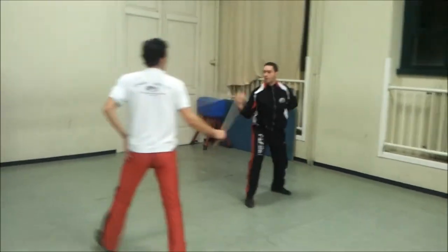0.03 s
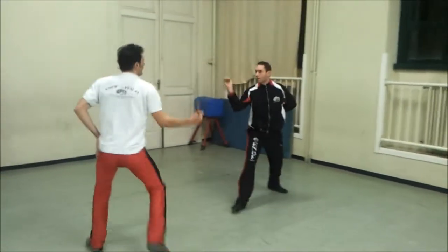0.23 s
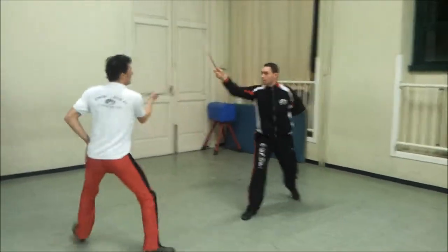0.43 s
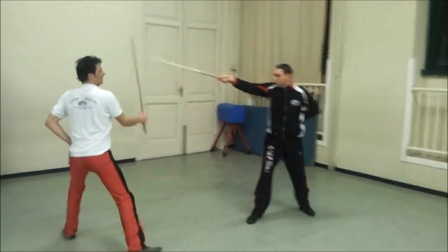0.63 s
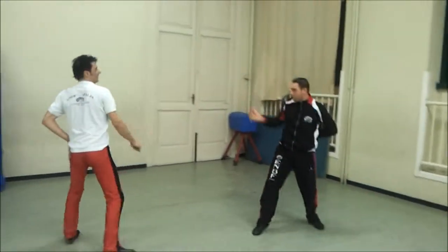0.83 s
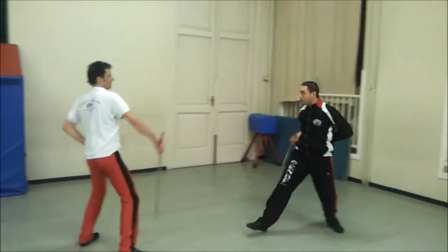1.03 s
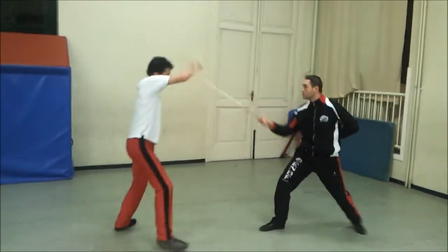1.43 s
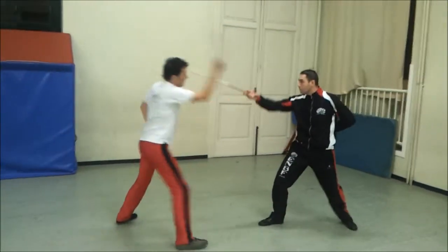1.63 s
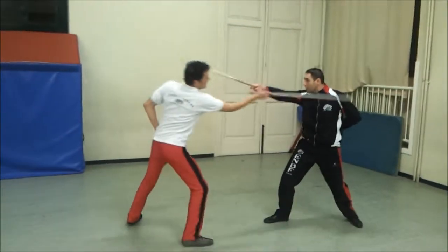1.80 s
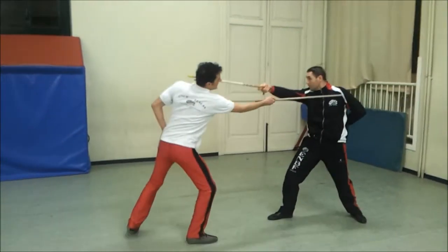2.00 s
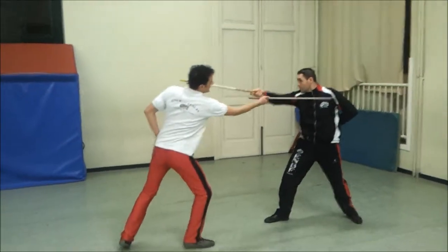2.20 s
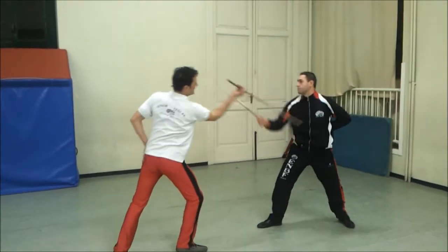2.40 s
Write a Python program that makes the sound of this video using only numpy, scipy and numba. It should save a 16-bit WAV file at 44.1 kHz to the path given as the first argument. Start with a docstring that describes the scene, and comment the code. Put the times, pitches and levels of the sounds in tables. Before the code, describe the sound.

Thin wooden sticks clash in an echoing training room over faint room air. A light double clack at 0.2 seconds precedes a very hard crack with a low thump at 0.5, its echo lingering. Two glancing touches follow around 0.7. A hollow stamping step lands at 1.2 and a last stick knock at 1.3. Sleeves rustle softly from 1.8, and a shoe slides from about 2.2.

```python
"""Faint room air, then a light double clack: two people spar with thin wooden sticks in a bare, echoing
training room. Each hit rings both sticks and snaps with noise. One very hard crack with a low thump
follows, then two glancing touches, a stamping step on a hollow-sounding floor and a last knock; sleeves
rustle and a shoe slides, both friction hiss. The hard crack overloads the gain control, whose slow
recovery holds the long echo level before letting it die."""
import sys
import numpy as np
from scipy import signal
from scipy.fft import rfft, irfft
from scipy.io import wavfile
from scipy.ndimage import uniform_filter1d
from numba import njit

SR = 44100
rng = np.random.default_rng(int(sys.argv[2]) if len(sys.argv) > 2 else 0)


def dump(signal):
    """Clip the signal to [-1, 1] and save it as 16-bit WAV at the path in sys.argv[1]."""
    limited = np.clip(np.atleast_2d(signal).T, -1, 1)
    pcm = np.round(limited * 32767).astype(np.int16)
    wavfile.write(sys.argv[1], SR, pcm)


N = 112454
HZ = np.fft.rfftfreq(N, 1 / SR)
T = np.arange(N) / SR

# stick hits (time [s], level [dB], first stick [dB], second stick [dB], crack [dB], reverb send [dB],
# boost frequency [Hz], boost [dB], left over right [dB])
STICK_HITS = [(.1878, -20.5, -3, -13, 10, 7, 5040, 5.5, 5), (0.1899, -21.5, 1.5, -11, 7, 7, 3500, 6.5, 4),
              (0.2117, -17, -2, -11.5, 3, 16.5, 6800, 8, 3),
              (.5113, 8.5, -13, -16.5, 1.5, 1.5, 4620, 6, 3.5),
              (0.5156, 4.5, -17, 0.5, -1.5, 8, 3600, 2, .5), (.718, -19.5, -27, -6, 3, 14, 4340, 12, -2),
              (.753, -11.5, -10, -1.5, 3.5, 8, 7650, 9.5, -5),
              (1.3409, -12.5, -13, -11, -5.5, -12, 6800, 14.5, 2),
              (1.3434, -11, -10, -4.5, -5.5, 6, 1990, 5.5, 5)]
# bending modes of each stick and of the floor (frequency [Hz], level [dB], t60 [s])
FIRST_STICK_MODES = [(332, -26, 0.053), (950, -22, 0.017), (1364, -10, 0.024), (1730, -7, 0.024),
                     (2206, -9.5, 0.044), (2740, -10.5, 0.027), (3416, -4, 0.012), (3860, -11, 0.024),
                     (4360, -14.5, 0.022), (5060, -5, 0.021), (5785, -6, 0.013), (7210, -21, 0.041)]
SECOND_STICK_MODES = [(569, -26.5, 0.041), (1261, -9.5, 0.026), (1622, -7.5, 0.022), (1994, -7, 0.016),
                      (2288, -3.5, 0.016), (2680, -6, 0.023), (3018, -5, 0.021), (3284, -6, .02),
                      (3580, -7.5, .017), (3898, -10, .018), (4243, -8.5, 0.015), (4715, -4, 0.017),
                      (5630, -20, 0.0076)]
FLOOR_MODES = [(404, -7, 0.034), (510, -5, 0.029), (652, -8.5, 0.018)]
# short rings at the struck spot
# (time [s], frequency [Hz], level [dB], t60 [s], reverb send [dB], left over right [dB])
WOOD_PINGS = [(0.2123, 4513, -6, 0.019, 4, 5), (1.3427, 2420, -4, 0.025, -9, 2)]
# dull thumps under the hard crack and its echo (time [s], level [dB])
THUMP_HITS = [(0.51, -30), (.531, -26.5)]
# footfalls (time [s], level [dB], reverb send [dB])
FOOTFALLS = [(1.225, -18, 4), (1.343, -22.5, 11.5)]
# rubbing strokes (start [s], rise [s], hold [s], time to fade 10 dB [s], level [dB])
SLEEVE_STROKES = [(1.82, 0.025, 0.23, 0.41, -33.5)]
SHOE_STROKES = [(2.18, 0.15, 0.084, 0.36, -33)]
# tone colour of each noise layer (frequency [Hz], level [dB])
AIR_EQ = [(25, -24), (60, -31), (105, -12), (220, 1.5), (490, 1.5), (1400, 3.5), (2400, 0), (4200, -9),
          (5600, -9.5), (7800, -4.5), (9500, -13), (13500, -34.5), (15500, -39)]
CRACK_EQ = [(50, -46), (130, -24), (300, -12.5), (500, -7), (950, 1), (1400, -1.5), (2600, 5), (4800, 5),
            (6000, 3.5), (8000, -2), (9500, -3.5), (13000, -16.5), (16000, -50)]
REVERB_EQ = [(100, -2.5), (500, -0.5), (1000, 1), (2500, 5), (4500, 0.5), (8000, 2), (10000, -1.5),
             (14000, -47)]
THUMP_EQ = [(20, 7), (60, -0.5), (150, -5), (300, -5.5), (500, -24), (1200, -49)]
SOLE_EQ = [(40, -41), (110, -19), (250, -12), (400, -4.5), (520, -2.5), (660, -6), (900, -16),
           (2500, -12.5), (5000, -38), (8000, -15.5), (11000, -26.5), (15000, -57)]
CLOTH_EQ = [(40, -42), (100, 0), (500, 0.5), (2000, 11.5), (5000, -4.5), (7800, -18), (9500, -9),
            (14000, -15.5), (16000, -32)]
SLIDE_EQ = [(50, -26), (110, -5), (250, 0.5), (520, 8.5), (850, 2.5), (1300, 6.5), (2400, 1), (3200, -4),
            (4500, -2.5), (5000, 4), (5500, -6.5), (7800, -4), (9200, -11), (12000, -15), (15000, -54)]
# the room's decay (frequency [Hz], t60 [s])
REVERB_DECAY = [(100, 3.1), (500, 2.8), (1300, 2.61), (2500, 2.31), (4500, 1.77), (8000, 1.146),
                (13000, 0.11)]
# likeness of left and right in the diffuse field (frequency [Hz], correlation [-1..1])
STEREO_CORRELATION = [(60, 0.42), (250, 0.75), (550, 1), (1000, 0.22), (1500, -0.33), (2800, 0.11),
                      (5000, 0.18), (10000, 0.001)]
# early reflections off walls and ceiling (delay [s], level against the tail [dB])
REFLECTIONS = [(0.014, -20), (0.016, -14), (0.0237, -13), (0.031, -17.5), (.045, -24)]


def amp(db):
    """Decibels to gain."""
    return 10 ** (np.asarray(db) / 20)


def curve(points, hz):
    """A table read along a log-frequency axis."""
    frequency, value = np.transpose(points)
    return np.interp(np.log(hz + 1), np.log(frequency + 1), value)


def add(mix, start, sound):
    """Lays a sound into the stereo mix, start in seconds."""
    part = mix[:, round(start * SR):][:, :sound.shape[1]]
    part += sound[:, :part.shape[1]]


def diffuse_noise(eq):
    """Coloured noise of rms 1 with the stereo width of a diffuse field."""
    mid, side = rfft(rng.standard_normal((2, N)))
    likeness = np.clip(curve(STEREO_CORRELATION, HZ), -.99, .99)
    mid, side = mid * np.sqrt(1 + likeness), side * np.sqrt(1 - likeness)
    noise = irfft(np.array([mid + side, mid - side]) * amp(curve(eq, HZ)), N)
    return noise / noise.std()


def burst(eq, t60, t):
    """A dying noise burst, evened out so that its spectrum follows the EQ curve."""
    fade = amp(-60 * t / t60)
    noise = rng.standard_normal((2, len(t))) * fade
    noise = noise + 0.348 * noise[::-1]  # crossfeed narrows the image
    colour = amp(curve(eq, np.fft.rfftfreq(len(t), 1 / SR)))
    for _ in range(6):  # impose the colour, then tighten the tail
        spectrum = rfft(noise)
        noise = irfft(spectrum / abs(spectrum) * colour, len(t)) / (1 + (t / t60) ** 4)
    return noise * np.sqrt(np.sum(fade ** 2) / np.mean(np.sum(noise ** 2, 1)))


def ring(modes, t, scatter_turns=0.11):
    """Quickly damped modes; neighbours swing in opposite senses, and phase scatter adds width."""
    hz, db, t60 = np.transpose(modes)[:, :, None]
    phase = np.arange(len(modes))[:, None] / 2 + scatter_turns * rng.standard_normal((2, len(modes), 1))
    return np.sum(amp(db - 60 * t / t60) * np.sin(2 * np.pi * (hz * t + phase)), axis=1)


def room_air(level_db=-40.5):
    """A steady, wide bed of air noise."""
    return amp(level_db) * diffuse_noise(AIR_EQ)


def sticks(attack_s=0.00083, crack_trim_db=-2.5, low_cut_hz=260):
    """Each hit rings both sticks under a splintery crack; the struck spot favours one register."""
    out, t = np.zeros((2, N)), T[:4096]
    for start, db, first_db, second_db, crack_db, send_db, boost_hz, boost_db, pan_db in STICK_HITS:
        wood = amp(first_db) * ring(FIRST_STICK_MODES, t) + amp(second_db) * ring(SECOND_STICK_MODES, t)
        crack = amp(crack_trim_db + crack_db) * burst(CRACK_EQ, t60=0.013, t=t)
        clack = amp(db) * (wood + crack) * np.minimum(t / attack_s, 1)
        register = signal.lfilter(*signal.iirpeak(boost_hz, Q=3, fs=SR), clack)
        clack += (amp(boost_db) - 1) * register
        add(out, start, in_room(clack, send_db, pan_db))
    return signal.sosfilt(signal.butter(6, low_cut_hz, "high", fs=SR, output="sos"), out)


def in_room(sound, send_db, pan_db=0, predelay_s=0.0087, build_s=0.01):
    """Panned direct sound, early reflections and a long diffuse tail that loses its treble first."""
    hz, t, spectrum = signal.stft(diffuse_noise(REVERB_EQ), SR, nperseg=512)
    decay = amp(-60 * t / curve(REVERB_DECAY, hz)[:, None])
    response = signal.istft(spectrum * decay, SR, nperseg=512)[1][:, :N]
    response *= np.clip((T - predelay_s) / build_s, 0, 1)
    lean_left_db = np.array([[.5], [-.5]])
    response *= amp(send_db + lean_left_db) / np.sqrt(np.sum(response ** 2) / 2)
    for delay, db in REFLECTIONS:
        for channel in response:
            arrival = delay + rng.uniform(-.0004, .0004)
            channel[round(arrival * SR)] += amp(db + send_db)
    response[:, 0] += amp(pan_db * np.array([.5, -.5]))  # direct path
    return signal.fftconvolve(sound, response, axes=1)[:, :N]


def pings(attack_s=0.00055):
    """A glancing contact rings one note of the wood, with a rounded attack."""
    out, t = np.zeros((2, N)), T[:4096]
    for start, hz, db, t60, send_db, pan_db in WOOD_PINGS:
        ping = ring([(hz, db, t60)], t) * np.minimum(t / attack_s, 1)
        add(out, start, in_room(ping, send_db, pan_db))
    return out


def thumps():
    """Short, low mono thumps give the hard crack its weight."""
    out = np.zeros((2, N))
    for start, db in THUMP_HITS:
        add(out, start, amp(db) * burst(THUMP_EQ, t60=0.055, t=T[:8192])[:1])
    return out


def feet(knock_attack_s=0.0024, low_cut_hz=170):
    """Soles slap down in a lunge and the floor answers with a hollow knock."""
    out, t = np.zeros((2, N)), T[:4096]
    for start, db, send_db in FOOTFALLS:
        knock = ring(FLOOR_MODES, t) * np.minimum(t / knock_attack_s, 1)
        slap = burst(SOLE_EQ, t60=0.02, t=t)
        add(out, start, in_room(amp(db) * (slap + knock), send_db))
    return signal.sosfilt(signal.butter(2, low_cut_hz, "high", fs=SR, output="sos"), out)


def friction(strokes, eq, roughness_db):
    """Diffuse rubbing hiss that swells, holds and fades, roughened by uneven grip."""
    envelope = np.zeros(N)
    for start, rise, hold, fade, db in strokes:
        fade_db = 10 * np.maximum(T - start - rise - hold, 0) / fade
        envelope += amp(db - fade_db) * np.clip((T - start) / rise, 0, 1)
    grip = uniform_filter1d(rng.standard_normal(N), size=700)
    return diffuse_noise(eq) * envelope * amp(roughness_db * grip / grip.std())


def sleeves():
    """Cloth rubs in a grainy rustle."""
    return friction(SLEEVE_STROKES, CLOTH_EQ, roughness_db=1.4)


def shoe_slide():
    """A sole drags over the floor with a smoother hiss."""
    return friction(SHOE_STROKES, SLIDE_EQ, roughness_db=0.6)


def scene():
    """Sticks, feet and clothes over the bed of room air."""
    return sticks() + pings() + thumps() + feet() + sleeves() + shoe_slide() + room_air()


@njit
def gain_reduction(over_db, attack_s, recovery_db_per_s):
    """Gain reduction in dB: it grabs an overload quickly and lets go at a steady rate."""
    out, cut_db = np.zeros(len(over_db)), 0.
    for i in range(len(over_db)):
        if over_db[i] > cut_db:
            cut_db += (over_db[i] - cut_db) / (attack_s * SR)
        else:
            cut_db = max(cut_db - recovery_db_per_s / SR, 0.)
        out[i] = cut_db
    return out


def record(dry, threshold_db=-11, low_cut_hz=43, high_cut_hz=15600):
    """Gain control ducks the hard crack, what slips through clips, and filters trim both ends."""
    power = signal.lfilter(np.ones(128) / 128, [1], (dry ** 2).mean(0))
    over_db = np.maximum(10 * np.log10(power + 1e-12) - threshold_db, 0)
    ducked = dry / amp(gain_reduction(over_db, attack_s=0.022, recovery_db_per_s=22))
    clipped = np.clip(ducked, -.93, .93)
    trimmed = signal.lfilter(*signal.butter(1, low_cut_hz, "high", fs=SR), clipped)
    high_cut = signal.firwin(255, high_cut_hz, window=("kaiser", 8), fs=SR)
    return signal.oaconvolve(trimmed, high_cut[None], "same")


dry = scene()
out = record(dry)
dump(out)
```